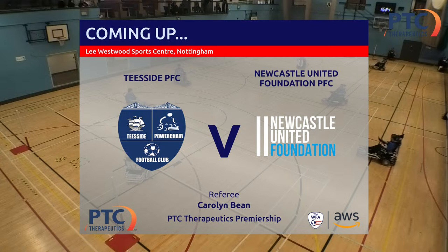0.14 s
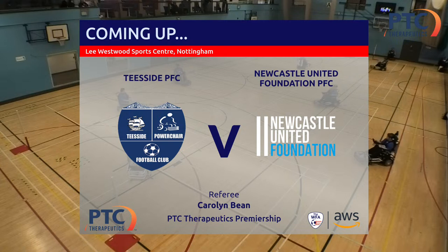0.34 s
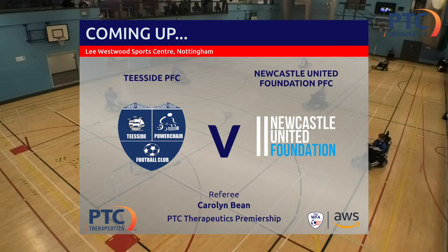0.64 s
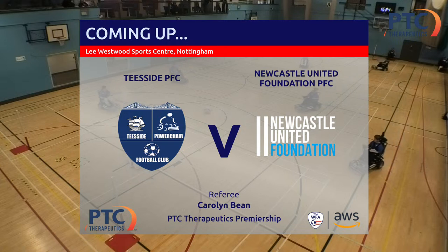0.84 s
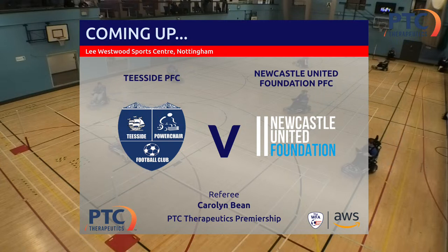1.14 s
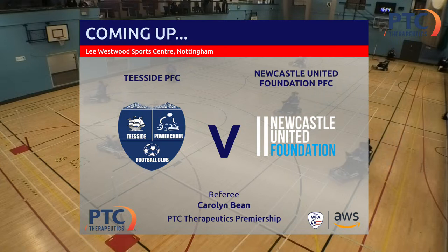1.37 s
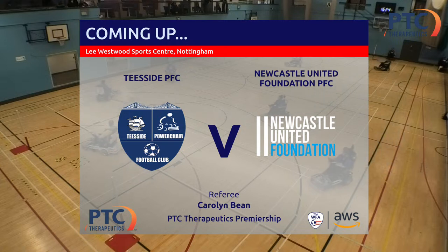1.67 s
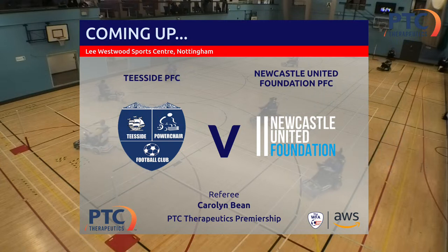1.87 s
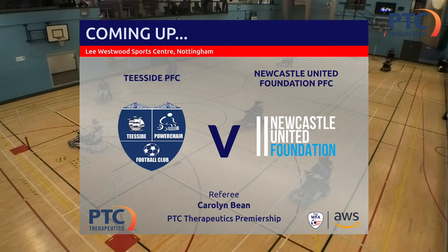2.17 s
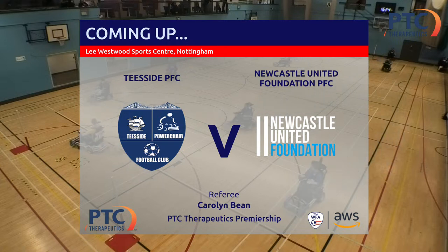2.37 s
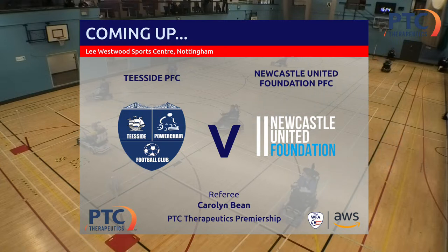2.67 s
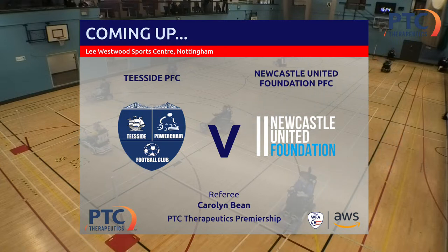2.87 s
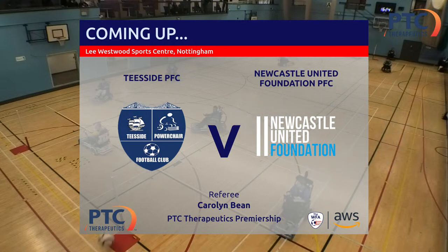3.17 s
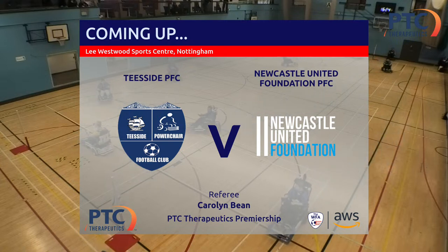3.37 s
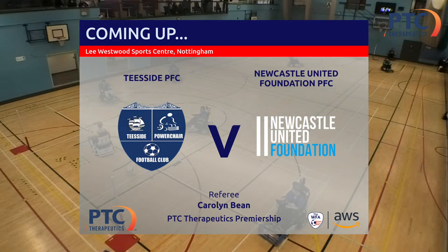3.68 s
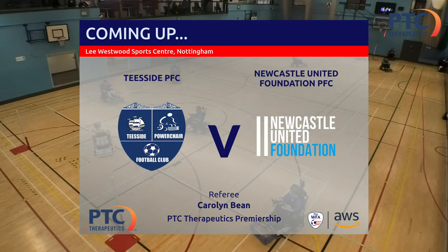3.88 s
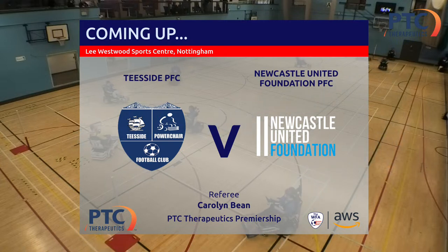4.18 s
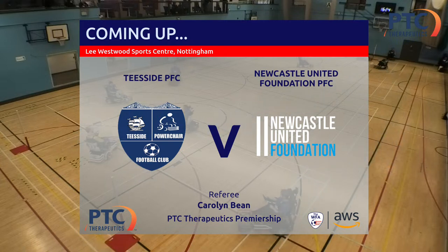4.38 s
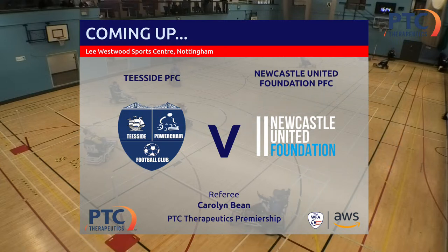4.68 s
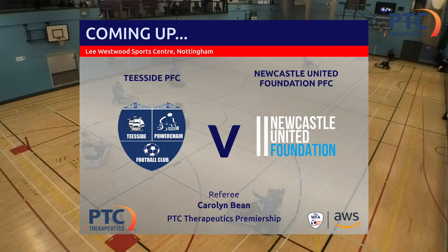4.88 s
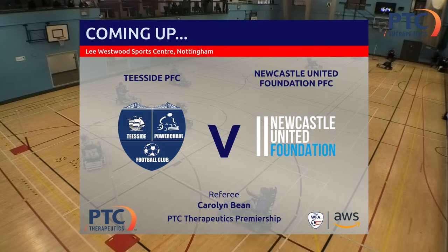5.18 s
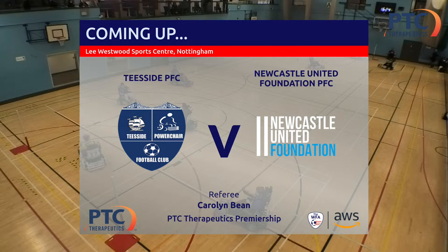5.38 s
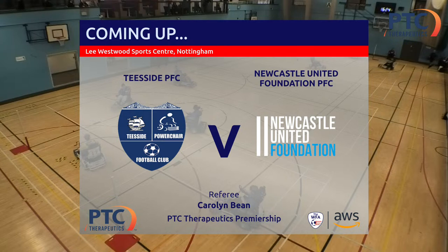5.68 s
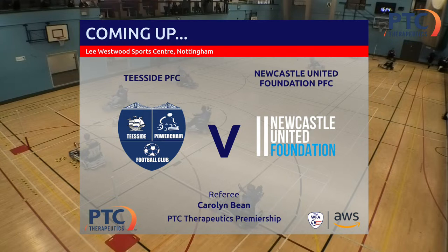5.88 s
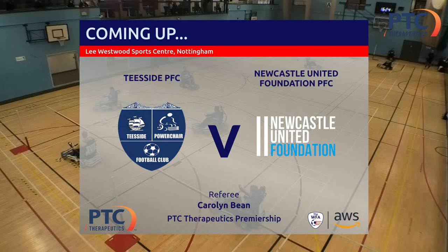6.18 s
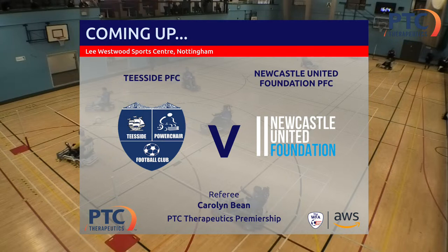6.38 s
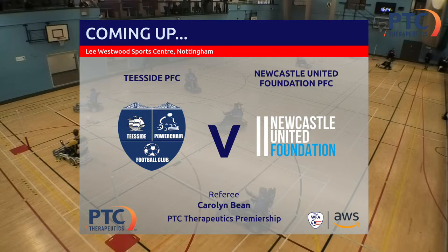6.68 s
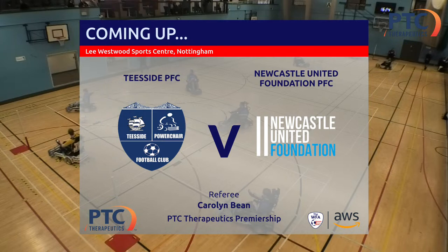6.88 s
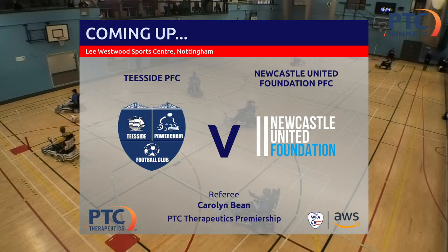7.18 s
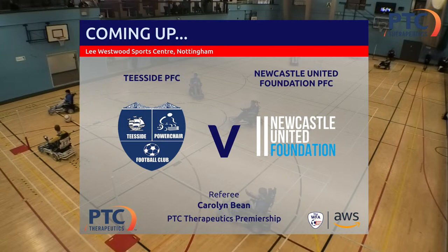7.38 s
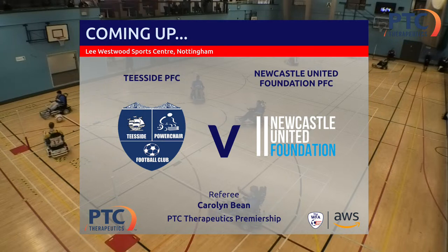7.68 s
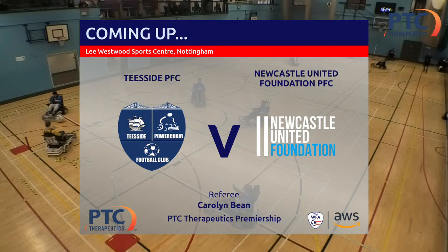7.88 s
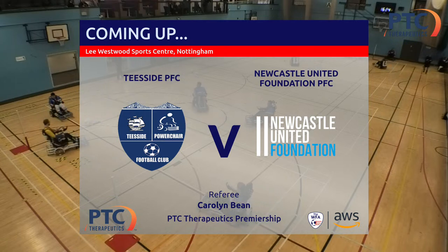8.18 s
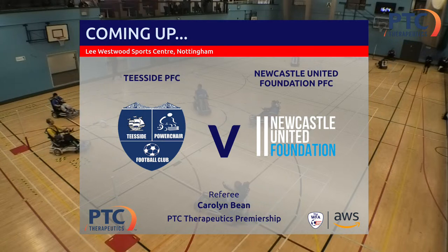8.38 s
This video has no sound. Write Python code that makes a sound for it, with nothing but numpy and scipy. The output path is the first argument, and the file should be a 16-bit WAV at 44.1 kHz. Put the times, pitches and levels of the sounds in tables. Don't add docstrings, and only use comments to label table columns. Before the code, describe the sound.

A loose plug clicks and buzzes loudly for about a second, snaps free with a tiny squeal, leaving quiet electrical hum and thin whine.

```python
import sys
import numpy as np
from scipy import signal
from scipy.fft import rfft, irfft, next_fast_len
from scipy.io import wavfile
from scipy.ndimage import uniform_filter1d

SR = 44100
rng = np.random.default_rng(int(sys.argv[2]) if len(sys.argv) > 2 else 0)


def dump(signal):
    limited = np.clip(np.atleast_2d(signal).T, -1, 1)
    pcm = np.round(limited * 32767).astype(np.int16)
    wavfile.write(sys.argv[1], SR, pcm)


def gain_from_db(level_db):
    decades = np.asarray(level_db, float) / 20
    return 10 ** decades


N = 376613
T = np.arange(N) / SR
BREAK_S, LAST_TOUCHES_S = 1.662, 1.617
MAINS_HZ, MAINS_SAG_HZ_PER_S = 49.892, .001
LINE_TOP_HZ, BURST_TOP_HZ = 14330, 15300


def colour(x, curve, lead_rad=0):
    size = next_fast_len(N)
    hz, db = np.transpose(curve)
    bin_hz = np.arange(size // 2 + 1) * SR / size
    gain = gain_from_db(np.interp(np.log(bin_hz + 1), np.log(hz), db))
    return irfft(rfft(x, size) * gain * np.exp(1j * lead_rad), size)[:N]


def hiss(curve):
    x = colour(rng.standard_normal(N), curve)
    return x / x.std()


def walk(rate_hz):
    hold = int(SR / rate_hz)
    steps = np.repeat(rng.standard_normal(N // hold + 1), hold)[:N]
    x = uniform_filter1d(steps, hold)
    return x / x.std()


def gate(on_s, off_s, release_s):
    out = np.zeros(N)
    span = slice(int(np.ceil(on_s * SR)), int((off_s + 20 * release_s) * SR) + 1)
    out[span] = np.exp(-np.clip(T[span] - off_s, 0, None) / release_s)
    return out


def within(spells):
    return sum(1. * (T >= on_s) * (T < off_s) for on_s, off_s in spells)


def shut(x, top_hz):
    return colour(x, [(top_hz - 60, 0), (top_hz + 60, -70)])


def mains_turns():
    return MAINS_HZ * T - MAINS_SAG_HZ_PER_S * T ** 2 / 2


RECTIFIER_EDGES = [(.669, -.47, 1), (.738, .43, .8), (.801, .46, 7.7), (.906, -.06, .1), (.062, -.17, 1.3)]
ODD_MULTIPLES = [-2, -6.5, -10, -15.5, -28.5, -20.5, -18, -26, -16.5, -27, -23.5, -24, -26.5, -30.5, -36.5]
# pitch_hz, level_db
UPPER_MULTIPLES = [(1500, -34.5), (2200, -38), (2600, -39.5), (3100, -41.5), (4300, -41.5), (4700, -40.5),
                   (5900, -46.5), (6400, -58)]
SCATTER_DB = 2 * rng.standard_normal(129)


def mains(leak_hz):
    n = np.arange(1, 130)
    turn = 2j * np.pi * n
    steps = sum(step * np.exp(-turn * at) / (decay + turn) for at, step, decay in RECTIFIER_EDGES)
    even_under_db, upper_even_under_db, second_db = -18, -20.5, -12
    db = np.interp(n * MAINS_HZ, *np.transpose(UPPER_MULTIPLES))
    db += upper_even_under_db * (n % 2 == 0) + SCATTER_DB
    low = n[:2 * len(ODD_MULTIPLES) - 1]
    db[low - 1] = np.interp(low, low[::2], ODD_MULTIPLES) + even_under_db * (low % 2 == 0)
    db[1] = second_db
    partials = gain_from_db(db) * steps / abs(steps)
    partials[1] = abs(partials[1]) * np.exp(1.9j)
    partials *= 1j * n * MAINS_HZ / (1j * n * MAINS_HZ + leak_hz)
    cycle = irfft(np.r_[0, partials], 4096) * 2048
    phase = (mains_turns() + .0008 * walk(100)) % 1
    wave = np.interp(phase, np.arange(4097) / 4096, np.r_[cycle, cycle[0]])
    return gain_from_db(-22.5 + 3) * wave


# pitch_hz, level_db
NEEDLE_COLOUR = [(900, -10.5), (2000, -5), (3000, -0.5), (4800, 1), (6000, -3), (6800, -16)]


def diode_needles():
    needle_share, fray, level_db = .008, .35, -44.5
    half_cycles = 2 * (mains_turns() - .692 + 0.00086 * walk(50))
    sign = 1 - 2 * (np.floor(half_cycles) % 2)
    needle = (sign + fray * rng.standard_normal(N)) * np.exp(-(half_cycles % 1) / needle_share)
    x = colour(gain_from_db(1.5 * walk(100)) * needle, NEEDLE_COLOUR)
    return gain_from_db(level_db) * x / x.std()


# pitch_hz, early_db, late_db
COMB_TONES = [(11402, -59, -75), (11698, -51, -72), (11999, -48, -62), (12301, -62, -55), (12597, -58, -68),
              (13496, -64, -61)]


def comb():
    turn_s, blend_s = 0.92, .05
    late = (1 + np.tanh((T - turn_s) / blend_s)) / 2
    tones = 0
    for pitch_hz, early_db, late_db in COMB_TONES:
        level = gain_from_db(4 + early_db + late * (late_db - early_db))
        tones = tones + level * np.sin(2 * np.pi * pitch_hz * T)
    return gain_from_db(2.0 * walk(30)) * tones


# pitch_hz, level_db per Hz
BUZZ_HISS_COLOUR = [(25, 7.5), (500, -2), (1200, -1.5), (2000, -9.5), (4000, -11.5), (6200, -12),
                    (8000, -8.5), (14300, -9.5)]
BUZZ_HISS_DB = -37
# on_s, off_s, level_db, release_s
TOUCHES = [
    (.1015, .109, -10, .001),
    (.4115, .434, -2, .001),
    (.434, .441, 0, .004),
    (.4705, 1.611, 0, .002),
    (1.617, 1.645, -3, .003),
    (1.652, 1.663, -3, .002),
]


def touched_line():
    touch = sum(gain_from_db(db) * gate(on_s, off_s, release_s) for on_s, off_s, db, release_s in TOUCHES)
    throb_db = 0.33 * np.cos(4 * np.pi * (MAINS_HZ * T - .22))
    noise = gain_from_db(BUZZ_HISS_DB + walk(30.51) + throb_db) * hiss(BUZZ_HISS_COLOUR)
    treble = (noise + comb()) * gain_from_db(-13.0 * (T > LAST_TOUCHES_S))
    buzz = mains(0.632) + diode_needles() + treble
    opened, idle = line_states()
    between = gain_from_db(-10.5 - 5 * (T > LAST_TOUCHES_S)) * (1 - opened - idle)
    return touch * buzz + between * gain_from_db(BUZZ_HISS_DB) * hiss(BUZZ_HISS_COLOUR)


def line_states():
    return 1. * (T < TOUCHES[1][0]), 1. * (T > BREAK_S)


# start_s, length_s, level_db
SPIT_BURSTS = [
    (.1055, .0012, -23),
    (.411, .006, -29),
    (.4235, 0.0049, -47),
    (.4345, 0.0021, -30),
    (1.237, .023, -39),
    (1.609, 0.013, -32.5),
    (1.6435, .005, -23),
    (1.66, 0.03, -25),
    (1.691, 0.024, -45.5),
]
# start_s, length_s, level_db
SCRAPE_BURSTS = [
    (.413, .004, -31),
    (.423, 0.0053, -29),
    (.44, .016, -54),
    (.455, 0.013, -43),
    (1.659, 0.031, -33.5),
]
# start_s, length_s, level_db
RUB_BURSTS = [
    (.417, .038, -37.5),
    (.108, 0.0054, -39.5),
]
# start_s, length_s, level_db
FIZZ_BURSTS = [
    (.101, .009, -39),
    (.428, 0.02, -41),
    (2.542, 0.0051, -44.5),
    (2.546, .015, -60),
    (2.5605, 0.0044, -44.5),
    (3.028, 0.035, -52),
    (3.36, .02, -62),
    (5.87, 0.018, -56),
    (7.34, 0.026, -65),
]
# on_s, off_s
PAIRED_SPELLS = [
    (3.06, 3.14),
    (3.23, 3.455),
    (3.62, 3.69),
    (3.74, 3.92),
    (4.39, 4.43),
    (4.68, 4.75),
    (4.87, 5.12),
    (5.25, 5.31),
]
# start_s, length_s, level_db, pitch_hz
ARC_RINGS = [
    (1.661, 0.033, -20, 5700),
    (1.667, 0.0052, -18.5, 7200),
    (1.668, .009, -18, 12300),
    (1.6705, .004, -10.5, 10000),
    (1.676, 0.014, -22, 10800),
    (1.689, .023, -34, 10500),
]


def sputter():
    hop_fizz = [(on_s, 0.027, -58.5) for on_s, off_s in PAIRED_SPELLS]
    kinds = [(SPIT_BURSTS, 8200, 10000), (SCRAPE_BURSTS, 2200, 3800), (RUB_BURSTS, 5700 - 200, 5700),
             (list(FIZZ_BURSTS) + hop_fizz, 12200, 4500)]
    bursts = [(*row, centre_hz, width_hz) for rows, centre_hz, width_hz in kinds for row in rows]
    bursts += [(*row, 1500) for row in ARC_RINGS]
    out = np.zeros(N)
    for start_s, length_s, db, centre_hz, width_hz in bursts:
        start, size = int(start_s * SR), int(length_s * SR)
        band = [max(centre_hz - width_hz / 2, 50), min(centre_hz + width_hz / 2, 17000)]
        sos = signal.butter(2, band, "band", fs=SR, output="sos")
        grain, swing = rng.standard_normal((2, 4096))
        ragged = grain * gain_from_db(9 * uniform_filter1d(swing, size=9))
        burst = signal.sosfilt(sos, ragged)[-size:]
        out[start:start + size] += gain_from_db(db) * burst / burst.std() * signal.windows.tukey(size, .3)
    return out


def squeal():
    start_s, length_s, level_db, pitch_hz = 1.6705, .0203, -11, 9987
    envelope = gate(start_s, start_s + length_s, .0004)
    return gain_from_db(level_db) * np.sqrt(2) * envelope * np.sin(2 * np.pi * pitch_hz * T)


# start_s, size [full scale], decay_s
VOLTAGE_JUMPS = [(.1058, -0.54, 0.00011), (.106, -0.19, 0.00008), (.4117, 0.18, 0.00023),
                 (.4152, -0.42, 0.00015), (1.6092, 1, 0.0001), (1.609, 0.087, 0.000024),
                 (1.663, -0.15, .0081), (1.6435, .89, 0.000062), (1.6495, -0.34, .00005),
                 (1.6697, 0.22, 0.00058), (2.543, .035, 0.000039), (2.5445, .02, .00005),
                 (2.5622, 0.068, 0.000041)]
# start_s, size [full scale], decay_s
BRUSH_SWINGS = [
    (0.1021, 0.21, 0.00037),
    (0.1033, 0.24, 0.0084),
    (0.1049, -0.2, .008),
    (.1062, -0.14, .004),
    (0.1077, -0.21, .003),
]


def voltage_steps():
    jumps, swings = (sum(size * gate(start_s, start_s, decay_s) for start_s, size, decay_s in rows)
                     for rows in (VOLTAGE_JUMPS, BRUSH_SWINGS))
    return uniform_filter1d(jumps, size=2) + uniform_filter1d(swings, size=9)


def contact():
    x = sputter() + squeal()
    return np.where(T < 1.7, shut(x, BURST_TOP_HZ), shut(x, LINE_TOP_HZ)) + voltage_steps()


# pitch_hz, level_db per Hz
OPEN_COLOUR = [(25, -7), (55, -8.5), (100, -24), (600, -20.5), (1500, -27), (6500, -27), (8500, -43),
               (14300, -49)]
# pitch_hz, level_db
WHISTLE_COLOUR = [(2500, -38.5), (3500, -3.5), (3800, 4), (4100, -9.5), (5500, -41)]


def open_line():
    rumble = gain_from_db(-47 + 6.5) * np.sin(2 * np.pi * 45 * T)
    whistle = gain_from_db(-49.5 + 1.2 * walk(43.0)) * gate(0.035, 0.2, 0.096) * hiss(WHISTLE_COLOUR)
    return gain_from_db(-46) * hiss(OPEN_COLOUR) + rumble + whistle


# time_s, level_db
IDLE_GAIN = [
    (1.722, -2.5),
    (1.9, 2),
    (1.98, -3.5),
    (2.2, -3),
    (2.5, 0),
    (3.5, 1),
    (6.6, 0),
    (6.9, -2.5),
    (8.54, -3),
]


def idle_level(level_db, follow):
    return gain_from_db(level_db + follow * np.interp(T, *np.transpose(IDLE_GAIN)))


# pitch_hz, level_db
HUM_COLOUR = [(50, 1), (100, -3), (140, 0), (1300, 0), (2000, -6), (4000, -10)]


def idle_hum():
    return idle_level(-29.5, 0.78) * gain_from_db(walk(10)) * colour(mains(115), HUM_COLOUR)


# time_s, pitch_hz
WHINE_GLIDE = [(1.72, 12880), (1.78, 12760), (1.84, 12760), (1.885, 13030), (1.93, 12500), (1.98, 12280),
               (2.08, 12190), (2.53, 12170)]
# on_s, off_s
RAISED_SPELLS = [
    (3.455, 3.74),
    (5.82, 5.9),
]
# pitch_hz, level_db under the whine
LONE_BEATS = [(1600, -13.5), (2509, -14.5), (14150, -15)]
# pitch_hz, level_db under the whine
TWIN_BEATS = [(2700, -18), (3600, -18)]


def wavering_tone(hz):
    return gain_from_db(walk(68)) * np.sin(2 * np.pi * np.cumsum(hz) / SR)


def whine():
    settle_s, lone_hz, raise_hz, pair_hz, twin_gap_hz = 2.54, 13250, 190, 12130, 1460
    paired = within(PAIRED_SPELLS)
    hop_hz = np.where(paired, pair_hz, lone_hz + raise_hz * within(RAISED_SPELLS))
    hz = np.where(T < settle_s, np.interp(T, *np.transpose(WHINE_GLIDE)), hop_hz)
    hz = hz + 45 * paired * walk(30)
    twin = np.where(T < settle_s, 1, paired)
    throb = np.sin(2 * np.pi * np.cumsum(87.3 + 1.5 * walk(3)) / SR)
    shake_hz = 45 * throb + 22 * walk(120)
    lone_beats, twin_beats = (
        sum(gain_from_db(db) * wavering_tone(f + f ** .5 / 110 * shake_hz) for f, db in lines)
        for lines in (LONE_BEATS, TWIN_BEATS))
    main = (1 + .68 * throb) * wavering_tone(hz + shake_hz)
    main = main + twin * wavering_tone(hz + twin_gap_hz + .4 * shake_hz)
    level = gain_from_db(-4.5 * twin + 1.2 * paired * walk(24.9))
    return level * main + (1 - twin) * lone_beats + twin * twin_beats


def idle_whine():
    flare_s, flare_width_s, flare_db = 1.7, .04, 4.5
    flare = gain_from_db(flare_db * np.exp(-((T - flare_s) / flare_width_s) ** 2))
    return idle_level(-57.5, .5) * flare * whine()


# pitch_hz, level_db per Hz
IDLE_COLOUR = [(20, 4.5), (70, 0), (250, -6.5), (600, -11.5), (2000, -11.5), (7000, -14.5), (12000, -7),
               (14300, -5)]
# pitch_hz, level_db
GROUND_COLOUR = [(20, -6), (38, -2), (55, -4), (75, 0), (95, -5), (125, -4), (200, -8), (300, -30)]
IDLE_HISS_DB, IDLE_HISS_FOLLOW = -53, 0.866


def idle_hiss():
    noise = idle_level(IDLE_HISS_DB, IDLE_HISS_FOLLOW) * gain_from_db(.5 * walk(28)) * hiss(IDLE_COLOUR)
    return noise + idle_level(IDLE_HISS_DB - 8.5, .3) * hiss(GROUND_COLOUR)


# pitch_hz, level_db per Hz
RIGHT_EARLY_COLOUR = [(25, 8), (200, 0), (2000, -4), (6500, -2.5), (14300, -2.5)]
# pitch_hz, level_db per Hz
RIGHT_IDLE_COLOUR = [(25, -4), (100, -12.5), (500, -25.5), (2000, -30.5), (7000, -33.5), (10000, -11.5),
                     (12000, 10), (14300, 19)]
# pitch_hz, level_db
LEAKAGE_COLOUR = [(25, -32.5), (60, -20), (120, -37), (1000, -43.5), (2000, -31.5), (4000, -29.5),
                  (10000, -24.5), (14300, -22)]


def right_line(steady, sharp):
    opened, idle = line_states()
    early = opened * gain_from_db(-67) + (1 - opened - idle) * gain_from_db(-61)
    late = idle * idle_level(IDLE_HISS_DB, IDLE_HISS_FOLLOW) * gain_from_db(-12)
    own = early * hiss(RIGHT_EARLY_COLOUR) + late * hiss(RIGHT_IDLE_COLOUR)
    source = steady * gain_from_db(11 * idle) + sharp * gain_from_db(15.5 * (T > 1.6))
    return colour(source, LEAKAGE_COLOUR, lead_rad=1.4) + shut(own, LINE_TOP_HZ)


def scene():
    opened, idle = line_states()
    left = touched_line() + opened * open_line()
    left += idle * (idle_hum() + idle_hiss() + idle_whine())
    steady, sharp = shut(left, LINE_TOP_HZ), contact()
    return np.array([steady + sharp, right_line(steady, sharp)])


def low_pass(x):
    return signal.sosfilt(signal.butter(12, 16570, fs=SR, output="sos"), x)


def record(dry):
    coupling = signal.butter(1, 22, "high", fs=SR, output="sos")
    mix = np.clip(signal.sosfilt(coupling, dry), -1, 1)
    return low_pass(mix)


dry = scene()
out = record(dry)
dump(out)
```